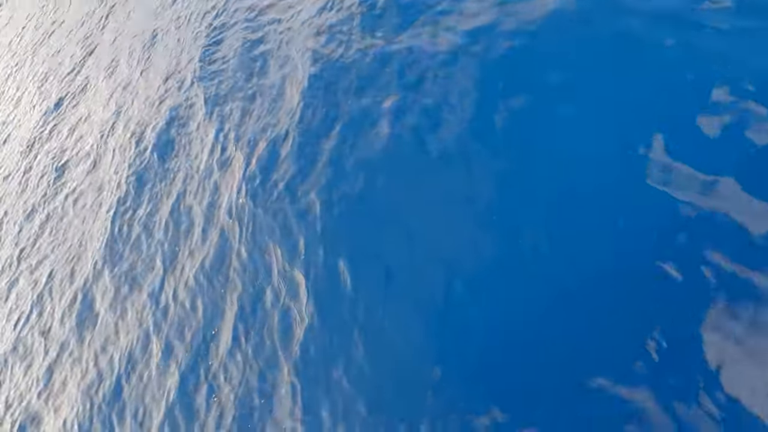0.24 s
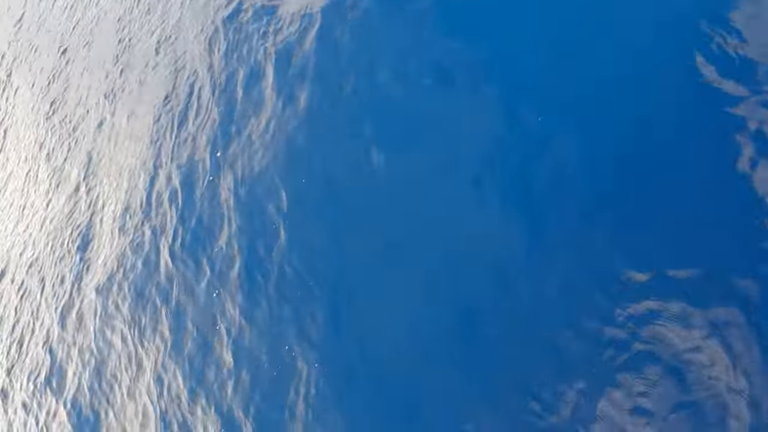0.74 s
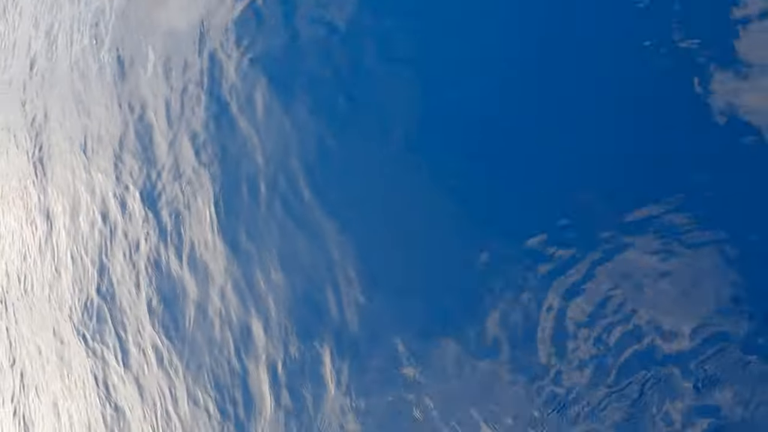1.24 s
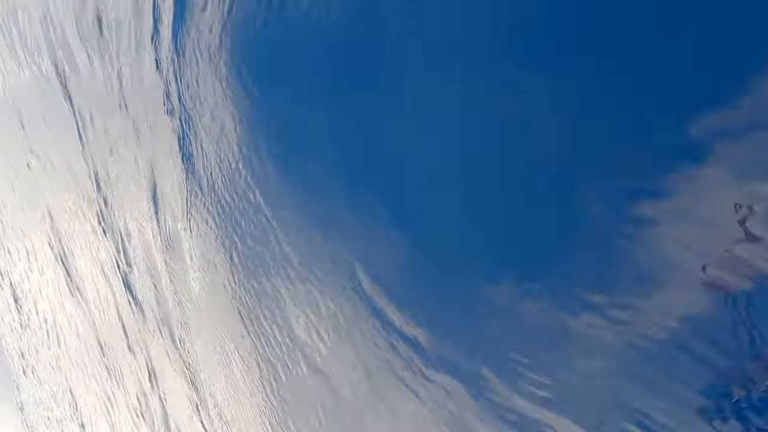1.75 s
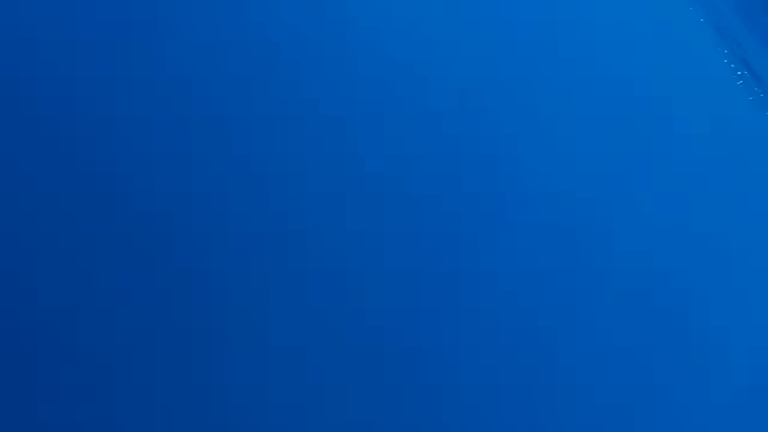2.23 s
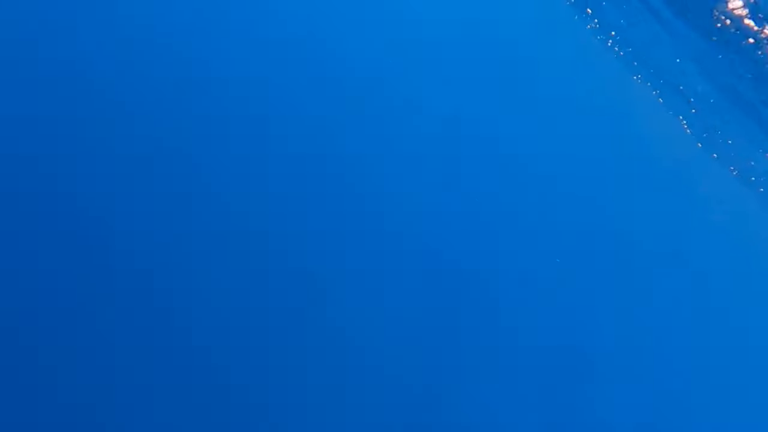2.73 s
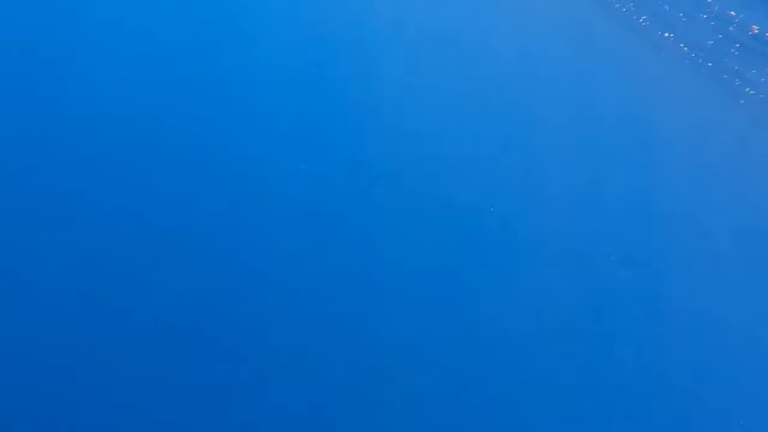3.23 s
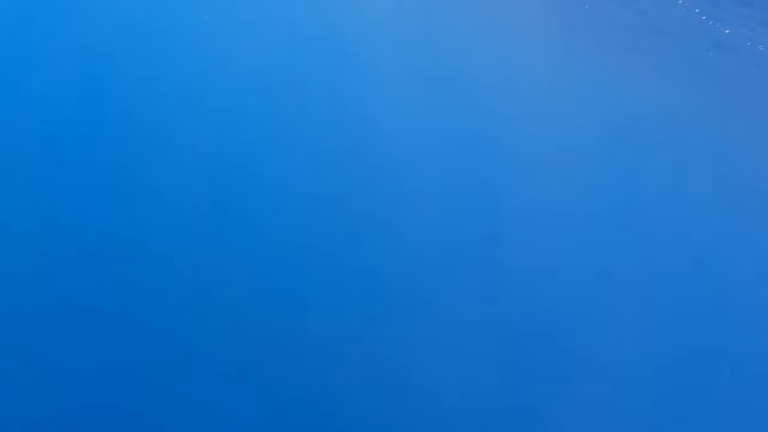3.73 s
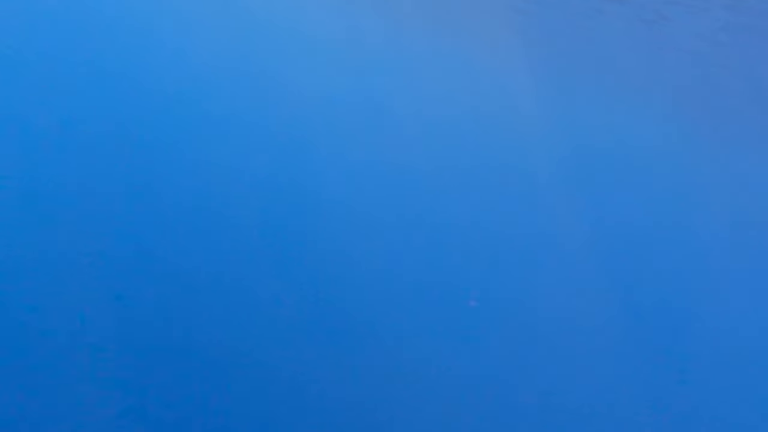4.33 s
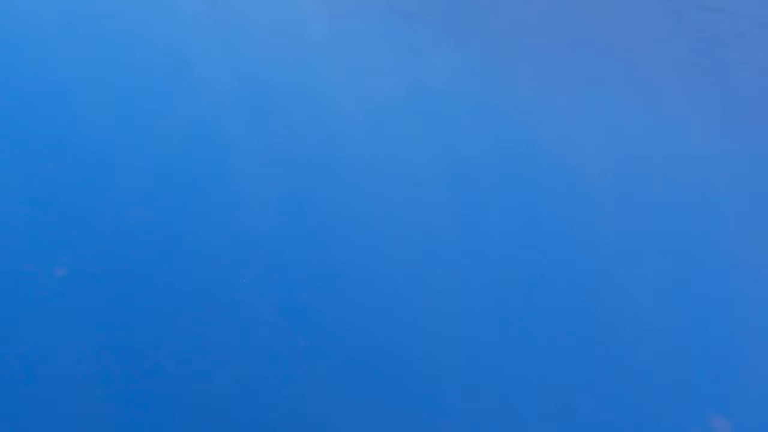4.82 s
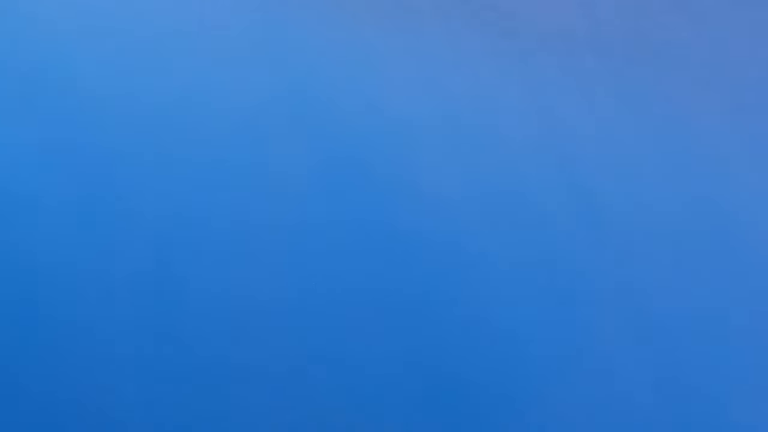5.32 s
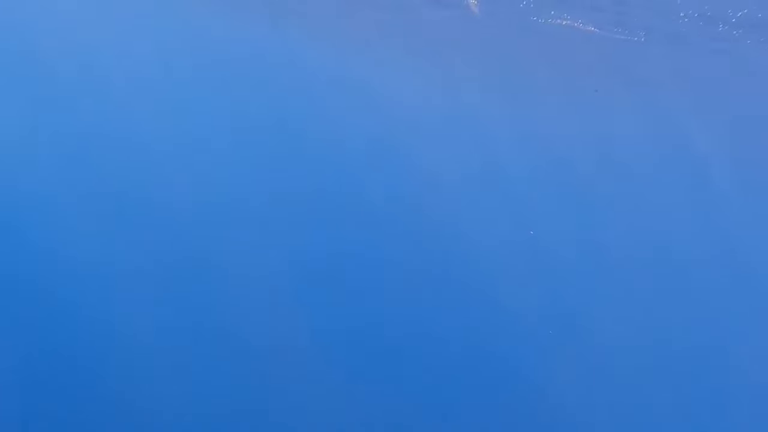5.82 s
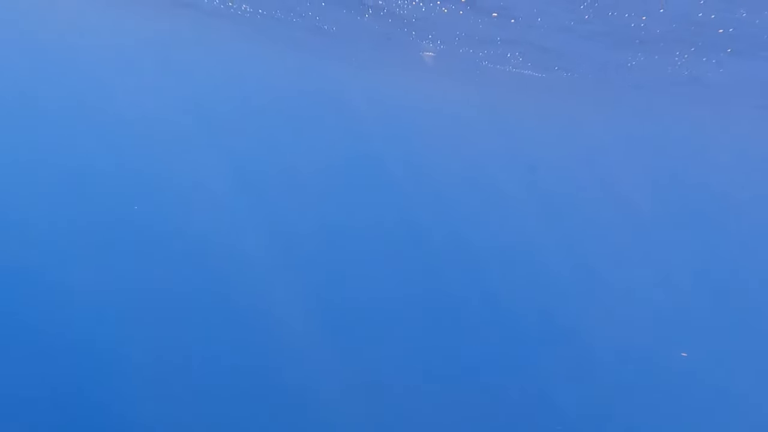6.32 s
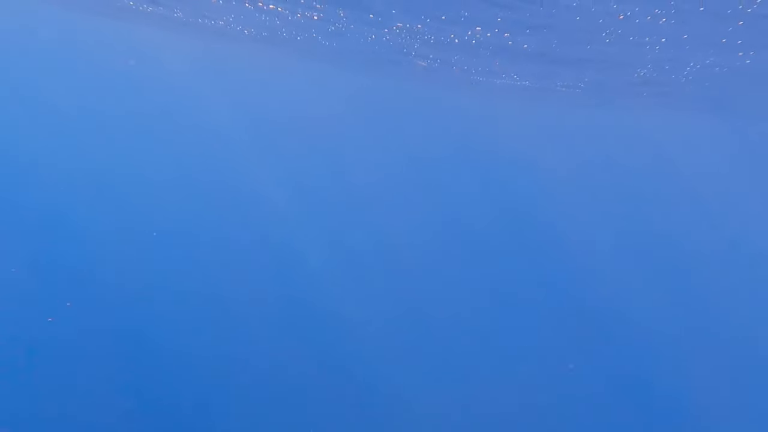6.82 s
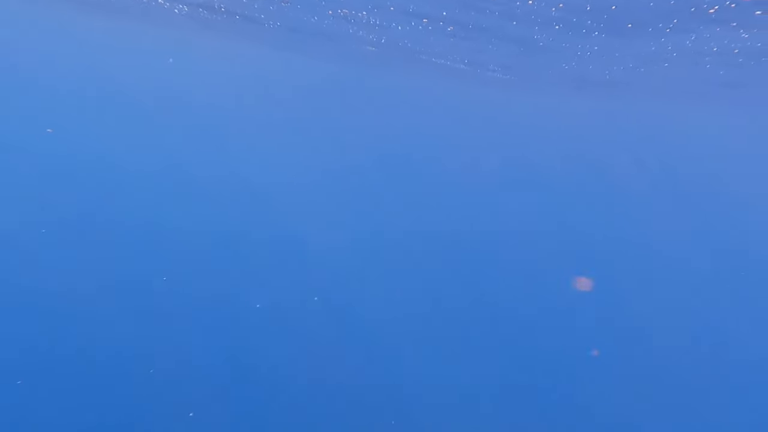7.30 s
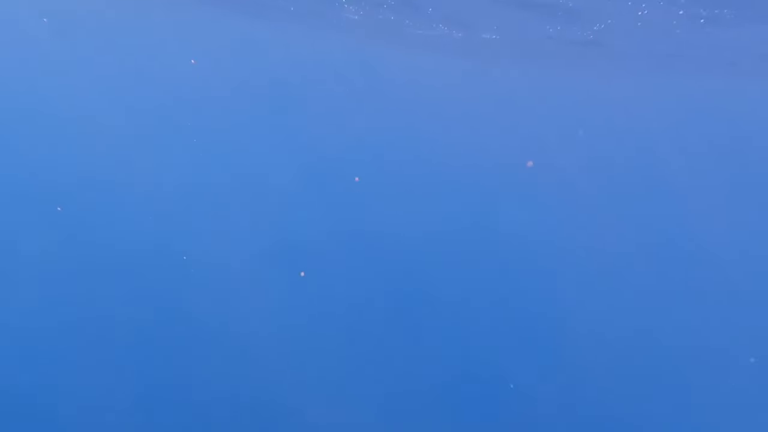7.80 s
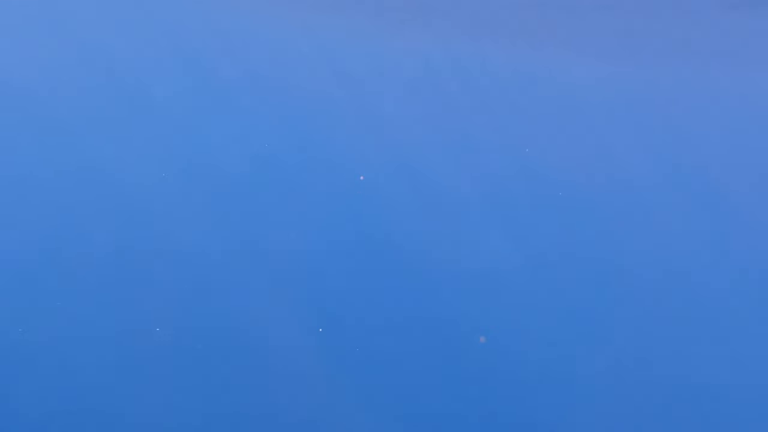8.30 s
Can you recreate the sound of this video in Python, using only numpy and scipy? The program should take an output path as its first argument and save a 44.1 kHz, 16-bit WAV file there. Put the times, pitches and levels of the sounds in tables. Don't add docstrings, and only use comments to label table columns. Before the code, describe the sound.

From 0 to 2.1 s the microphone hangs just above open sea: low, irregular wind thumps, strongest near 0.4, 1.2 and 2 s, thin wake hiss, small wavelet slaps, and a very low engine throb beneath. At about 2.1 s it plunges, with sharp ticks, a brief fizz and a dense burst of bright plinking bubbles, falling in pitch by 2.4 s. Larger air bubbles then glug and gurgle, hollow and rounded, until about 3.5 s. The bubble screen clears between 3.3 and 3.5 s and a nearby diesel comes forward: a muffled, rough drone of about 26 knocks a second, ringing hull plates, deep heaving and a mid-pitched gear whine. Around 5.3 to 5.7 s the engine dips and labours, the whine sliding down, then partly recovers and wavers around 6 s. It runs on slightly slower, with soft low water slosh and faint hiss, until cut off at 8.5 s.

```python
import sys
import numpy as np
from scipy import signal
from scipy.fft import rfft, irfft, next_fast_len
from scipy.io import wavfile
from scipy.ndimage import uniform_filter1d, map_coordinates

SR = 44100
rng = np.random.default_rng(int(sys.argv[2]) if len(sys.argv) > 2 else 0)


def wav_out(sig):
    wavfile.write(sys.argv[1], SR, np.round(np.clip(np.atleast_2d(sig).T, -1, 1) * 32767).astype(np.int16))


def how_loud(loudness_db):
    steps = np.asarray(loudness_db, float) / 20
    return 10 ** steps


N = 377055
SUBMERGED_S = 2.12
CLEAR_S = 3.46
CYLINDERS = 6


def unit(x):
    return x / np.sqrt(np.mean(x ** 2) + 1e-20)


def curves(rows, off=None):
    s, *cols = np.transpose(rows)
    return [uniform_filter1d(np.interp(np.arange(N) / SR, s, c, off, off), size=181) for c in cols]


def swells(rows, rise_s, under_db=-120):
    t = np.arange(0, N / SR, 1 / 1000)
    s, db, fade_s = np.transpose(rows)[:3, :, None]
    power = how_loud(db + 20 * np.minimum((t - s) / rise_s, (s - t) / fade_s)) ** 2
    summed = np.interp(np.arange(N) / SR, t, power.sum(0))
    return 10 * np.log10(summed + how_loud(under_db) ** 2 + 1e-14)


def wobble(rate):
    coarse = np.arange(0, N + 64, 64)
    knots = rng.standard_normal(int(N * rate / SR) + 4)
    return np.interp(np.arange(N), coarse, map_coordinates(knots, [coarse * rate / SR]))


def filtered(x, response):
    m = next_fast_len(N + SR // 2)
    return irfft(rfft(x, m) * response(np.fft.rfftfreq(m, 1 / SR)), m)[:N]


def coloured(x, points):
    f, db = np.transpose(points)
    return unit(filtered(x, lambda hz: how_loud(np.interp(np.log(hz + 1), np.log(f + 1), db))))


def resonances(modes):
    def response(f):
        total = 0
        for k, (centre, width, db) in enumerate(modes):
            damping = 1j * f * width
            total = total + (-1) ** k * how_loud(db) * damping / (centre * centre - f * f + damping)
        return total
    return response


def noise(grit_db=None, rate=40):
    return rng.standard_normal(N) * (1 if grit_db is None else how_loud(grit_db * wobble(rate)))


def bubbles(s, gain, hz, cycles, rise):
    t = np.arange(int(min(.11, 2.3 * np.max(cycles / hz)) * SR)) / SR
    age = t * (hz / cycles)[:, None]
    turns = hz[:, None] * t * (1 + rise[:, None] * np.minimum(age, 1.5) / 2)
    wave = gain[:, None] * np.sin(2 * np.pi * turns) * np.exp(-3 * age) * (1 - np.exp(-(age / 0.1) ** 2))
    wave *= np.minimum(1, 4 * (1 - t / t[-1]))
    at = np.round(s * SR).astype(int)[:, None] + np.arange(len(t))
    return np.bincount(at.ravel(), wave.ravel(), N + SR)[:N]


def swarm(t0, t1, pitch_hz, count, spread, cycles, rise, scatter_db):
    when, size, stretch, upper = rng.random((count, 4)).T
    s = t0 + (t1 - t0) * when
    hz = pitch_hz[(s * SR).astype(int)] * np.exp(spread * 2.45 * (stretch + upper - 1))
    gain = how_loud(-scatter_db * np.log(1 - size)) * np.sqrt(hz)
    cloud = bubbles(s, gain, hz, cycles + 0 * s, rise * stretch)
    return unit(cloud) * np.sqrt((t1 - t0) * SR / N)


# start_s, level_db, fade_20db_s
SURGES = [(0.375, -24, .5), (0.6, -25, .5), (1.0, -27, .15), (1.07, -23, .2), (1.24, -27, .4),
          (1.5, -29, .5), (1.9, -27, .5), (2.14, -32, .15), (2.4, -20, .06), (2.19, -22, .08),
          (2.35, -26, .1), (2.65, -24, .3), (2.78, -23, .2), (2.9, -22, .25), (3.14, -30, .2),
          (3.3, -24, .25), (3.86, -34, .4), (4.29, -31, .15), (5.3, -31, .15), (6.59, -32, .6)]
# freq_hz, level_db
SLOSH = [(15, 1), (35, 5), (60, 10.5), (110, 15), (160, 6.5), (260, 0.5), (400, -60)]
# freq_hz, level_db
DEEP = [(1470, -26.5), (2500, 2.5), (3060, -3), (3440, -7.5), (4090, -15.5), (4840, -26), (5530, -36.5),
        (7840, -33), (10200, -57), (17200, -120)]


def water():
    steady_db = curves([(SUBMERGED_S, -36), (CLEAR_S + .5, -31.5)])[0]
    slosh = how_loud(swells(SURGES, .06, steady_db) + 3.0) * coloured(noise(2.2, 20), SLOSH)
    hiss_db = curves([(2.4, -110), (2.6, -89), (4.2, -70), (7.4, -70), (8.55, -76)])[0]
    return slosh + how_loud(hiss_db) * coloured(noise(2.0, 7.4), DEEP)


# start_s, level_db, fade_20db_s
GUSTS = [(0.0, -24, .05), (0.385, -22, .1), (0.43, -27, .2), (0.22, -32, .1), (0.585, -24, .4),
         (1.07, -23, .08), (1.23, -22, .1), (1.255, -19, .1), (1.29, -23, .15), (1.5, -32, .3),
         (1.78, -34, .2), (1.9, -27, .3), (2.04, -18.5, .16)]
# freq_hz, level_db
PUFF = [(53, -27.5), (90, -7.5), (216, -3), (329, -4.5), (361, -3), (418, -11), (460, -14.5), (700, -32.5),
        (910, -78), (1540, -120)]
# freq_hz, level_db
SPRAY = [(260, -33), (450, -5), (629, -13), (780, -12.5), (838, -14.5), (967, -13.5), (1520, -15.5),
         (1660, -22.5), (2010, -21), (2800, -25), (7840, -58), (10200, -78.5), (17200, -120)]
# start_s, level_db, fade_20db_s
WAVELETS = [(.13, -55, .15), (.21, -55, .1), (.33, -57, .1), (.58, -50, .4), (.68, -52, .1),
            (.77, -53, .15), (.95, -52, .3), (1.08, -50, .4), (1.24, -52, .1), (1.43, -54, .2),
            (1.6, -60, .2), (1.95, -51, .4)]


def air():
    t = np.arange(N) / SR
    breeze_db = -38.5
    puff_db = swells(GUSTS, .025, breeze_db)
    puffs = how_loud(puff_db) * coloured(noise(2.6, 45), PUFF)
    spray_db = -42 - 2.2 * t + .08 * (puff_db - breeze_db)
    breaking = coloured(noise(2, 30), [(700, -30), (1100, 0), (2000, 0), (2800, 0), (3700, -11), (4900, -10),
                                       (5600, -18), (7000, -60)])
    hiss = how_loud(spray_db - 1) * coloured(noise(1.5, 12), SPRAY)
    hiss += how_loud(swells(WAVELETS, .2)) * breaking
    dry_port = uniform_filter1d(1. * (t < SUBMERGED_S), size=400)
    return dry_port * (puffs + hiss)


# start_s, peak_db, pitch_hz
PLINKS = [(2.098, -14, 2900), (2.105, -16, 4170), (2.107, -20, 2900), (2.105, -27, 1800),
          (2.125, -11, 2950), (2.1181, -13, 4420), (2.125, -6, 3700), (2.134, -16, 4900),
          (2.136, -16, 3000), (2.146, -16, 3800), (2.1495, -13, 2950), (2.151, -14, 3750),
          (2.172, -23, 4300), (2.173, -18, 2450), (2.177, -17, 3200), (2.184, -12, 1350),
          (2.1786, -14, 2120), (2.186, -7, 2330), (2.2, -7.5, 2520), (2.213, -40, 5600), (2.241, -27, 2000),
          (2.243, -30, 3300), (2.2134, -18.5, 2440), (2.2613, -18, 2374), (2.2674, -16, 1773),
          (2.2774, -19, 2736), (2.2875, -13, 2420), (2.276, -32, 4450), (2.255, -34, 4400),
          (2.294, -16, 2500), (2.319, -19, 2600), (2.329, -19, 2700), (2.363, -32, 5300),
          (2.3111, -11, 1094), (2.3376, -10, 2960), (2.3545, -9, 1210), (2.7661, -15, 1174),
          (3.2625, -23, 1060), (3.275, -27, 1100), (3.3997, -23, 1050), (3.43, -27, 1130),
          (3.5289, -18, 1076)]
# start_s, peak_db, pitch_hz
STRAYS = [(2.3624, -21, 1840), (2.4657, -27, 2140), (2.4828, -32, 1940), (2.5377, -29, 1780),
          (2.564, -30.5, 2370), (2.6658, -23, 1900), (2.7107, -41, 1840), (2.7447, -29, 1710),
          (2.8255, -38, 2030), (2.8435, -28, 1930), (2.8744, -29, 1950), (2.951, -38, 1700),
          (2.9701, -33, 1700), (3.0056, -35, 1980), (3.6202, -41, 1944), (3.7743, -43, 1750),
          (3.8944, -48.5, 1740)]
# start_s, peak_db, pitch_hz, life_cycles, pitch_rise_share
GLUGS = [(2.367, -11, 470, 5.8, 0.06), (2.386, -3.5, 295, 6.8, 0.2), (2.396, -4.5, 327, 7, 0.15),
         (2.412, -7, 324, 10, 0.15), (2.474, -10, 396, 10, 0.15), (2.518, -24.5, 720, 30, 0.093),
         (2.559, -9, 452.4, 30, 0.27), (2.669, -8, 560, 40, 0.2), (2.664, -11, 800, 14, .02),
         (2.537, -15, 445, 14, .05), (2.612, -26, 1050, 20, .05), (2.726, -17, 800, 16, .1),
         (2.875, -12, 800, 14, .02), (2.905, -11, 560, 12, .02), (2.835, -13, 350, 8, .05),
         (3.165, -14, 740, 22, .05), (3.226, -17, 476, 12, .1), (3.372, -16, 630, 12, .05),
         (3.4, -16, 300, 4, .1), (2.625, -14, 125, 5, .1), (2.465, -16, 760, 14, .05),
         (2.95, -15, 740, 16, .05), (2.764, -11, 698, 12, 0.05), (2.802, -10, 465, 7.8, 0.35),
         (2.884, -8, 690, 30, -0.3), (2.935, -8, 480, 12, 0.05), (3.022, -9.5, 613, 10, 0.13),
         (3.074, -10.5, 572, 8.8, 0.054), (3.129, -22, 542, 10, 0.094), (3.167, -7.5, 436, 11, 0.15),
         (3.25, -14, 583, 18, 0.11), (3.272, -9.5, 429, 24, 0.075), (3.302, -8.5, 432, 12, 0.19),
         (3.399, -9, 604, 15, 0.22), (2.56, -14, 110, 5, .15), (2.67, -10, 116, 5, .15),
         (2.9, -13, 135, 5, .1)]
# start_s, peak_db, pitch_hz, life_cycles, pitch_rise_share
SLAPS = [(.115, -38, 1600, 20, .05), (.206, -37, 2700, 20, .05), (.235, -25, 365, 8, .05),
         (.376, -14, 190, 2.2, .1), (.379, -21, 430, 2.5, .1), (1.224, -19, 400, 3, .1),
         (.585, -17, 280, 5, .05), (.99, -22, 150, 4, .1), (1.064, -18, 185, 4, .1),
         (1.169, -35, 1640, 40, .03), (1.221, -15, 250, 4, .1), (1.247, -12, 260, 3, .1),
         (1.286, -18, 330, 4, .1), (2.036, -36, 2600, 20, .05), (2.063, -33, 1200, 12, .1)]
# start_s, peak_db
TICKS = [(2.105, -16.5), (2.116, -9.5), (2.2884, -40), (2.3371, -33.5), (2.362, -32.5), (2.414, -44),
         (2.427, -48), (2.4655, -46), (2.6728, -48), (2.6824, -48)]
# start_s, peak_db
SNAPS = [(2.4643, -36), (2.5376, -45), (2.5564, -38), (2.595, -49), (2.6289, -57), (2.6704, -38),
         (2.6814, -37), (2.7104, -49), (2.7447, -38), (2.7621, -37), (2.8174, -42), (2.8714, -39),
         (2.9502, -53), (2.9696, -48), (3.0056, -46), (3.2344, -57)]


def singles():
    small = [(*row, 11, .13) for row in PLINKS + STRAYS]
    s, db, hz, cycles, rise = np.transpose(small + GLUGS + SLAPS)
    out = bubbles(s - .12 * cycles / hz, how_loud(db + 2.5), hz, np.maximum(cycles, 2), rise)
    s, db = np.transpose(TICKS)
    out += bubbles(s, how_loud(db + 7), 6000 + 0 * s, 2.5 + 0 * s, 0 * s)
    s, db = np.transpose(SNAPS)
    return out + bubbles(s, how_loud(db - 1), 3100 + 0 * s, 3 + 0 * s, 0 * s)


# start_s, level_db, fade_20db_s, pitch_hz
SHEETS = [(2.116, -20, .1, 3800), (2.15, -23, .06, 3200), (2.178, -23, .05, 2800), (2.198, -22, .04, 2300),
          (2.265, -23, .06, 2200), (2.29, -21, .08, 2300), (2.335, -22, .2, 1900), (2.38, -28, .1, 1400),
          (2.41, -28, .08, 1260)]
# start_s, level_db, fade_20db_s
FIZZ = [(2.116, -29.5, .035), (2.17, -60, .1), (2.27, -57.5, .07), (2.415, -59, .05), (2.475, -65, .04),
        (2.56, -74, .04)]
# start_s, level_db, fade_20db_s
SHOVES = [(2.1, -31, .2), (2.157, -17, .04), (2.19, -23, .025), (2.28, -28, .12), (2.325, -22, .06)]


def plunge():
    pitch_hz = curves(SHEETS)[2]
    cloud = swarm(2.06, 2.47, pitch_hz, count=800, spread=.27, cycles=9, rise=.3, scatter_db=2)
    fizz = coloured(noise(4, 200), [(3500, -40.5), (5000, 2.5), (7000, -5.5), (8500, -9.5), (11000, -14.5),
                                    (14000, -23), (16000, -55)])
    shove = coloured(noise(6.8, 90), [(150, -21), (250, 1.5), (600, -3.5), (1000, -7.5), (1500, -35.5)])
    out = how_loud(swells(SHEETS, .022) - 5.5) * cloud
    out += how_loud(swells(FIZZ, .02) + 2.0) * fizz
    return out + how_loud(swells(SHOVES, .03)) * shove


# start_s, level_db, fade_20db_s
BELCHES = [(2.38, -14, .16), (2.415, -13, .04), (2.48, -20, .1), (2.675, -13, .06), (2.74, -21, .15),
           (2.81, -19, .3), (2.874, -17, .3), (2.95, -18, .15), (3.09, -23, .5)]
# start_s, level_db, fade_20db_s
FROTH = [(2.34, -24, .1), (2.42, -29, .05), (2.475, -42, .06), (2.55, -46, .04), (2.668, -36, .03),
         (2.73, -42, .2), (2.765, -39, .05), (2.83, -39, .12), (2.88, -37, .04), (2.97, -50, .04),
         (2.6, -54, .04), (3.014, -50, .12), (3.1, -53, .1), (3.22, -56, .1), (3.75, -58, .2),
         (4.3, -58, .4)]
# freq_hz, level_db
FOAM = [(150, -47.5), (250, -19), (458, 4), (759, -6), (1010, -17.5), (1220, -27.5), (1560, -35),
        (1990, -36.5), (2900, -41), (3700, -56), (4470, -74), (5600, -98), (10200, -116), (17200, -120)]


def gurgle():
    leak_db = curves([(2.36, -23), (3.6, -23)], off=-120)[0]
    glug_db = swells(BELCHES, .05, leak_db)
    foam_db = swells(FROTH, .03, leak_db - 43)
    fading = curves([(3.38, 2.5), (3.5, -10)])[0]
    size_hz = curves([(2.33, 735), (2.37, 490), (2.43, 431), (2.5, 568.6), (2.8, 606), (3.2, 517), (3.6, 598)])[0]
    cloud = swarm(2.3, 3.6, size_hz, count=320, spread=.33, cycles=15, rise=.3, scatter_db=1)
    churn = coloured(noise(3, 50), [(150, -8), (250, 0), (800, 0), (1250, -9), (1500, -25), (4000, -60)])
    churn *= .5 * np.max(uniform_filter1d(np.abs(cloud), size=SR))
    churn *= curves([(2.3, 1), (3.6, 1)], off=0)[0]
    muffling = [(130, -12), (250, -1), (780, -0.5), (950, -8), (1400, -17), (4000, -62), (6000, -100)]
    muffled = coloured(cloud + churn, muffling) * np.std(cloud)
    foam = coloured(coloured(noise(5.5, 60), FOAM), [(800, -52.5), (1100, -7)])
    return how_loud(glug_db + fading - 4.5) * muffled + how_loud(foam_db + 3.0) * foam


# time_s, rate_hz
FIRING = [(0.0, 27.15), (1.0, 25.98), (2.0, 26.63), (3.1, 27.94), (3.6, 26.37), (4.1, 26.42), (4.6, 26.14),
          (5.0, 26.35), (5.3, 26.1), (5.45, 24.2), (5.65, 22.35), (5.85, 24.44), (6.1, 25.61), (6.3, 24.46),
          (6.55, 24.48), (7.0, 25.1), (7.5, 24.73), (8.55, 24.88)]


def gears(crank):
    ahead = curves([(s - .1, rate) for s, rate in FIRING])[0]
    hz = 30 * uniform_filter1d(ahead, size=int(.15 * SR))
    whine_db = -30.5
    db = np.minimum(whine_db - .16 * (hz - 745), -25)
    sag_hz = 13 * np.clip((800 - hz) / 50, .2, 1)
    hz = hz - sag_hz * np.cos(2 * np.pi * (crank - 3.1) / CYLINDERS) + 1.5 * wobble(30)
    under = curves([(3.35, 0), (3.4, 1)])[0]
    in_gear = curves([(5.6, 0), (6.8, 1)])[0]
    slack_db = -9 * np.exp(-(((crank - .75) % 3 - 1.5) / .2) ** 2)
    mesh = 2 * np.pi * np.cumsum(hz) / SR
    whine = under * how_loud(db + slack_db + 2.5 * wobble(18)) * np.sin(mesh)
    partner = in_gear * how_loud(whine_db - 12 + 3 * wobble(40)) * np.sin(3 * mesh / 2 + 1.1 * wobble(40))
    return np.sqrt(2) * (whine + partner)


# time_s, level_db
HEAVE = [(0.0, -36), (0.5, -38), (0.71, -29), (0.9, -37), (1.4, -31), (1.9, -33), (2.1, -26), (2.3, -35),
         (2.9, -35), (3.3, -21), (3.97, -19.5), (4.81, -15), (5.28, -16.5), (5.43, -13.5), (8.55, -13.5)]
# start_s, level_db, fade_20db_s
ROLLS = [(0.71, -27, .8), (1.9, -19.5, .9), (2.3, -24, .3), (3.08, -23, .8), (3.7, -23, 1.2),
         (4.3, -23, 1.5), (4.9, -24, 1), (5.25, -24, .25), (5.95, -30, 1), (8.2, -28, 2)]
# time_s, level_db
THIRD = [(0, -37), (1.2, -25), (2.3, -24), (2.45, -33), (3.0, -27), (5.7, -29), (5.95, -23.5), (7.0, -23.5),
         (8.55, -26)]


def hull_thrum(heave, crank):
    def order(multiple, level_db, offset=0):
        return np.sqrt(2) * how_loud(level_db) * np.cos(multiple * 2 * np.pi * crank + offset)
    thrum = np.sqrt(2) * how_loud(curves(HEAVE)[0] + 1.2 * wobble(6.1)) * np.cos(2 * np.pi * heave)
    thrum += order(2, swells(ROLLS, .9, -34) - 1 + 2.5 * wobble(9), 1.4 + .55 * wobble(8))
    thrum += order(3, curves(THIRD)[0] - 1 + 1.5 * wobble(9), 4.45 + .55 * wobble(8))
    thrum += order(1.5, -35 + 5.5 * wobble(5), 1.2 * wobble(6))
    return thrum + order(7, -46)


# freq_hz, width_hz, level_db
BLOCK = [(1340, 220, -5), (1590, 260, 0), (2090, 590, -11)]
# freq_hz, level_db
KNOCK = [(680, -20), (1150, -1), (1260, -2.5), (1610, -4), (1730, -15), (1810, -22), (1960, -26.5),
         (2340, -35.5), (4000, -60.5), (5200, -91.5), (8800, -120)]


def block_knock(phase, fired, habit):
    rattle = (np.exp(-phase / .14) + .22) * (noise() + .45 * habit)
    knock = coloured(filtered(0.85 * unit(fired) + unit(rattle), resonances(BLOCK)), KNOCK)
    flow = coloured(noise() * (.9 + np.exp(-phase / .25)),
                    [(1500, -30.5), (1850, 2), (2200, -1.5), (2500, -16.5), (3300, -26), (4500, -50.5)])
    return knock + how_loud(-21.5) * flow


# freq_hz, width_hz, level_db
PLATES = [
    [(324.8, 90, -10.5)],
    [(474.3, 50, -3), (541.4, 60, -9)],
    [(640, 40, 1.5), (695, 50, -8)],
    [(761.5, 50.7, -9)],
    [(950, 70, -17.5)],
    [(1070, 50, -16)],
    [(1160, 55, -14)],
    [(1300, 70, -16)],
]
IDLING = [(2, -4, 1, 0, 4, -7, -6, -4), (-1, -1, 1, -2, -8, -8, 2, -7), (-2, 3, 3, 0, -2, -8, -6, -1),
          (3, 2, -1, 0, -6, 1, 0, -7), (2, 3, -5, 3, -5, -9, -2, 3), (-4, -6, 2, -3, -9, -3, -6, -3)]
LOADED = [(-2, 1, 4, 0, 5, -3, -1, -8), (-2, -1, -3, 1, -5, -3, -2, -2), (0, -1, 2, -2, 0, -6, -2, -5),
          (-1, 2, 0, 1, 6, 2, 2, -1), (-4, 0, -7, 0, 6, -6, -1, -1), (2, 1, 2, -3, -3, -4, -1, 0)]
ARRIVES = [.35, .1, .1, .2, .08, .1, .3, .08]
SHAFT = [1.1, 1.15, 1.05, 1, .8, .6, .65, .55]
# freq_hz, level_db
PORT = [(150, -18), (280, -3), (790, -1), (860, -3.5), (1250, -2), (1800, -25.5), (4000, -70.5)]


def plate_ring(crank, cylinder, fired, habit):
    phase = crank % 1
    push = unit(phase / .17 * np.exp(1 - phase / .17) * (.6 * noise() + habit))
    rumble = noise()
    load = curves([(5.25, 0), (5.6, 1)])[0]
    scatter_db = 1.3 * rng.standard_normal((N // 1000, len(PLATES)))[np.cumsum(fired)].T
    ring = 0
    for k, (idle_db, load_db) in enumerate(zip(np.transpose(IDLING), np.transpose(LOADED))):
        strike_db = (1 - load) * idle_db[cylinder] + load * load_db[cylinder] + scatter_db[k]
        arrived = np.diff(np.floor(crank - ARRIVES[k]), prepend=0) > 0
        blow = .85 / SHAFT[k] * unit(arrived) + .5 * push
        mean_db = (1 - load) * idle_db.mean() + load * load_db.mean()
        shaft = (SHAFT[k] + .25 * load) * how_loud(mean_db) * rumble
        ring = ring + (-1) ** k * filtered(how_loud(strike_db) * blow + shaft, resonances(PLATES[k]))
    return coloured(ring, PORT)


# time_s, lag_cycles
LAG = [(0, .53), (5.3, .53), (5.65, .83), (8.55, .83)]


def engine():
    heave = -1.44 + np.cumsum(curves(FIRING)[0]) / SR
    crank = heave - curves(LAG)[0]
    cylinder = np.floor(crank % CYLINDERS).astype(int)
    fired = np.diff(cylinder, prepend=0) != 0
    since = np.arange(N) - np.maximum.accumulate(np.arange(N) * fired)
    habit = rng.standard_normal((CYLINDERS, SR // 10))[cylinder, since]
    after = np.arange(N) / SR - CLEAR_S
    ring_db = -20 + np.minimum(33 * after, -.5 * after)
    knock_db = np.minimum(np.interp(after, [-.3, .25], [-58, -41.5]), ring_db)
    out = hull_thrum(heave, crank) + gears(crank)
    out += how_loud(knock_db + 3.0) * block_knock(crank % 1, fired, habit)
    return out + how_loud(ring_db) * plate_ring(crank, cylinder, fired, habit)


def scene():
    return (water() + air() + singles() + plunge() + gurgle() + engine())[None]


def top_cut(x):
    return signal.sosfilt(signal.butter(12, 14200, fs=SR, output="sos"), x)


# freq_hz, level_db
MICROPHONE = [(20, 0.5), (5000, 0), (8000, -9), (12000, -24), (16000, -41.5)]


def record(dry):
    heard = coloured(dry[0], MICROPHONE)[None] * np.std(dry)
    limited = heard / (1 + np.abs(heard / .95) ** 10) ** (1 / 10)
    return top_cut(limited)


dry = scene()
out = record(dry)
wav_out(out)
```